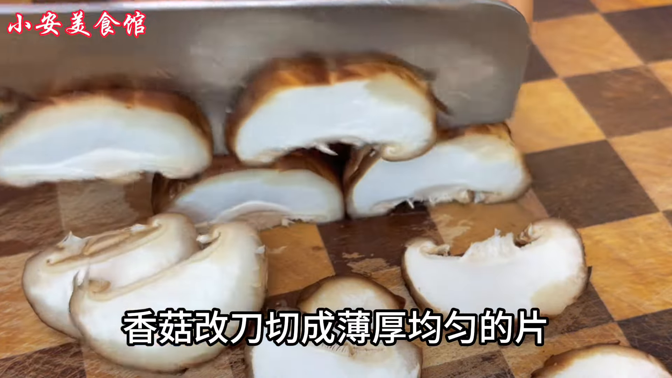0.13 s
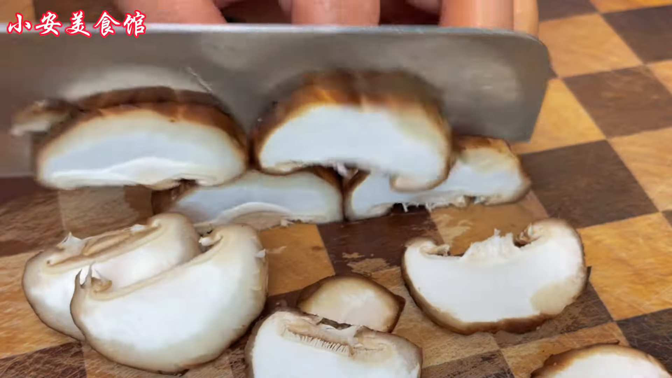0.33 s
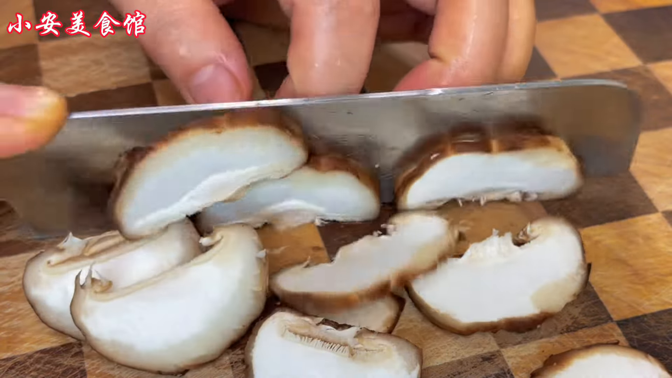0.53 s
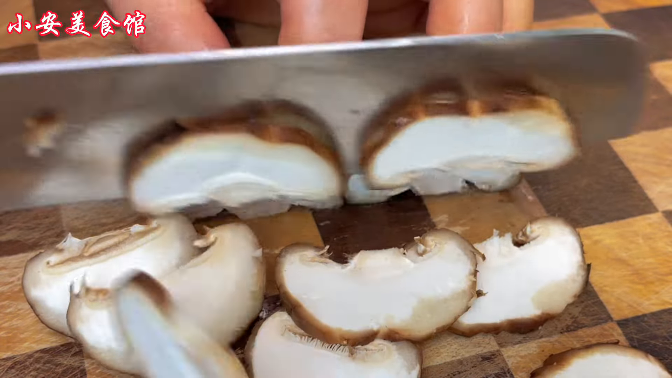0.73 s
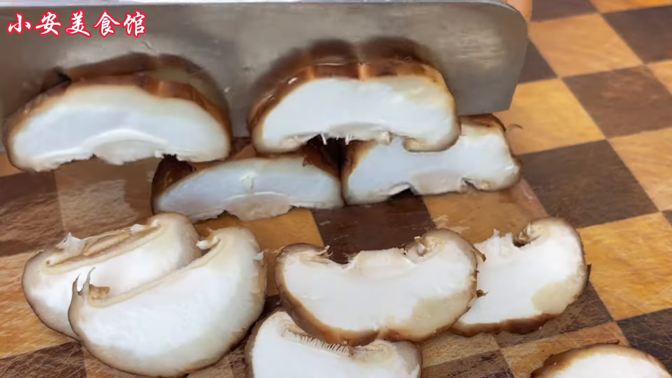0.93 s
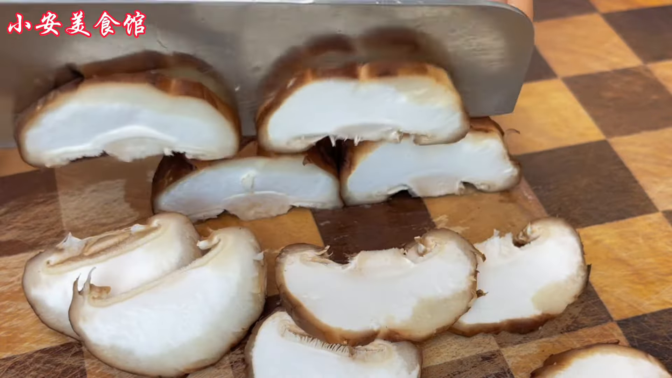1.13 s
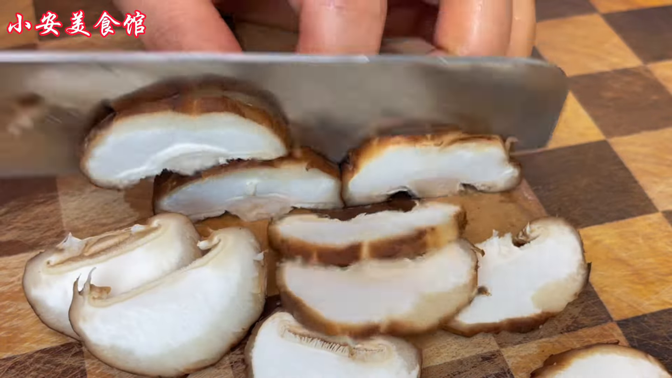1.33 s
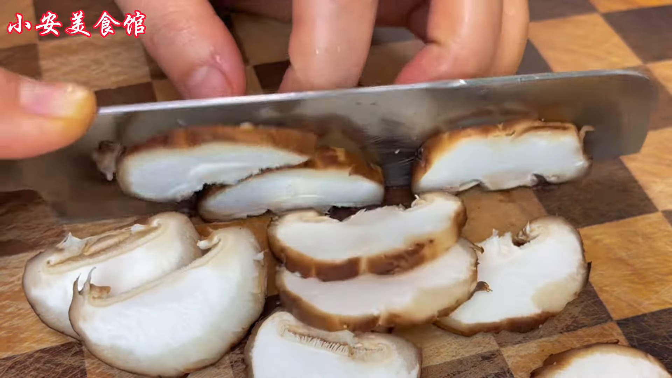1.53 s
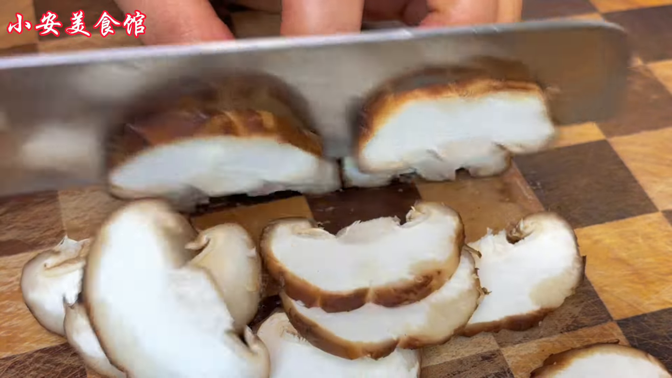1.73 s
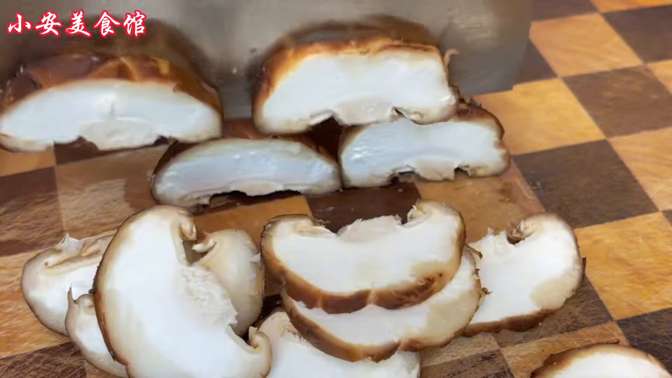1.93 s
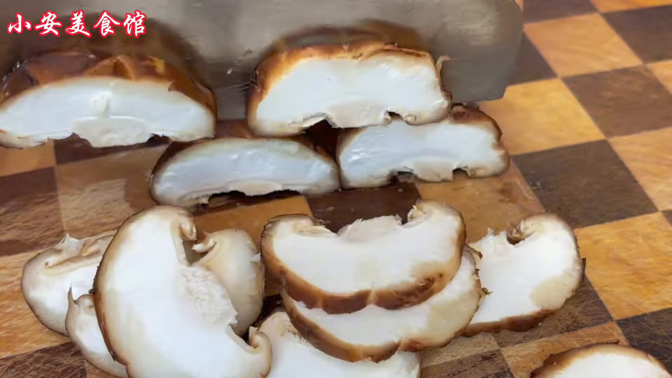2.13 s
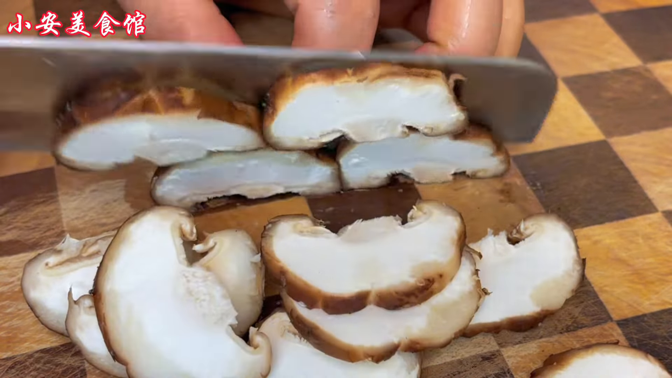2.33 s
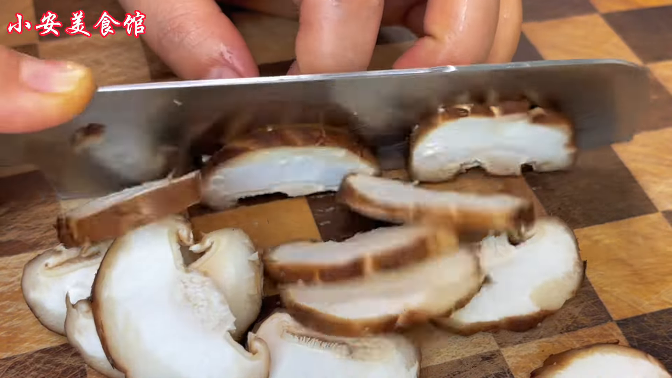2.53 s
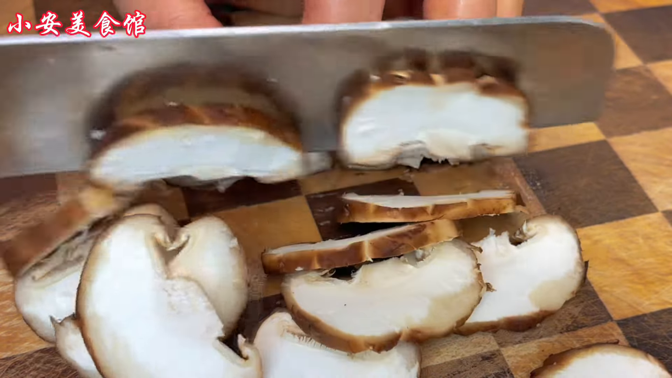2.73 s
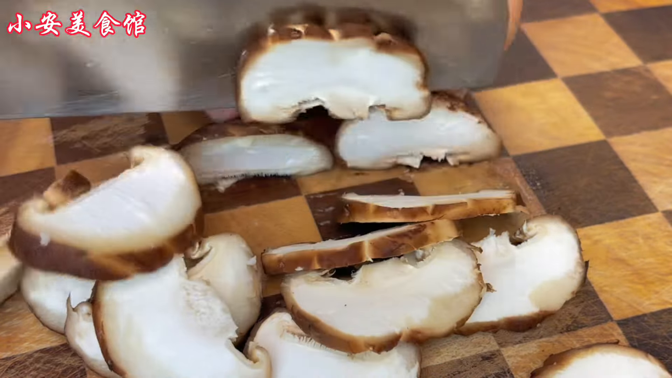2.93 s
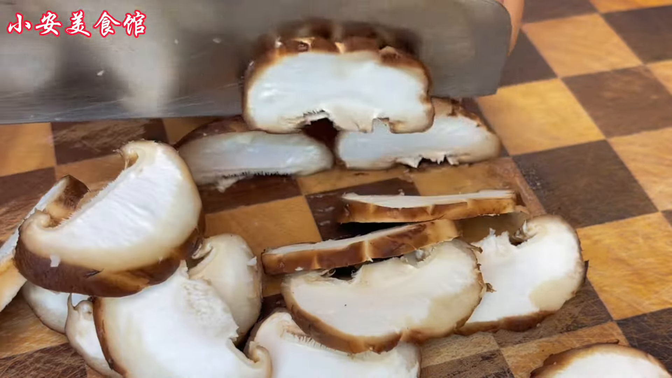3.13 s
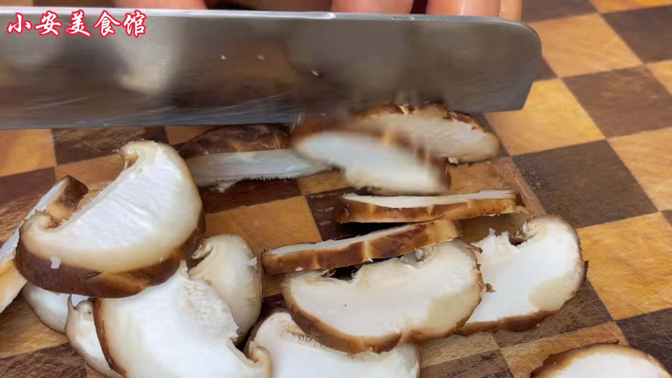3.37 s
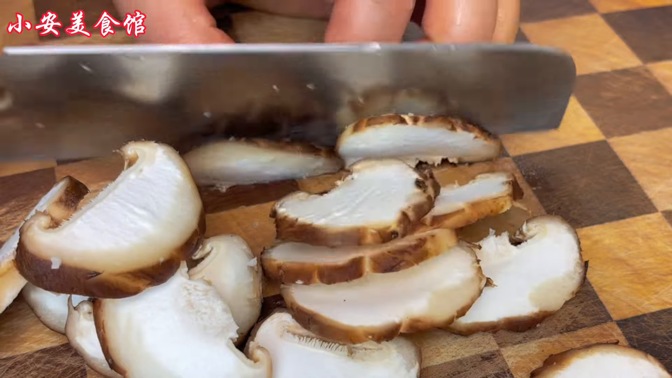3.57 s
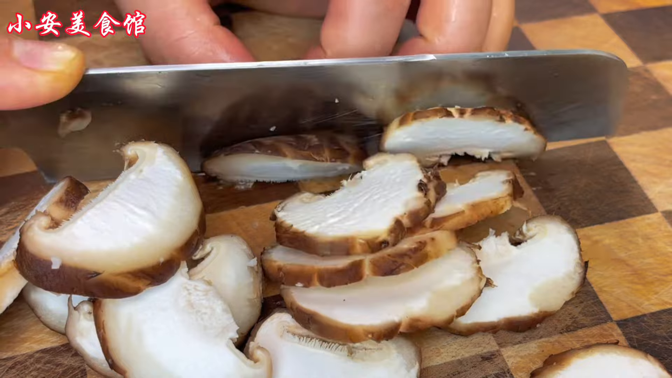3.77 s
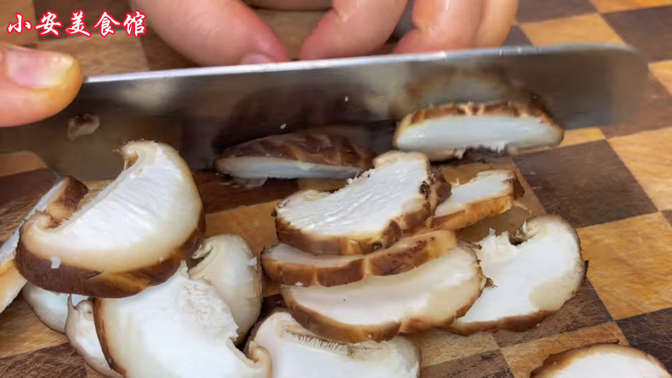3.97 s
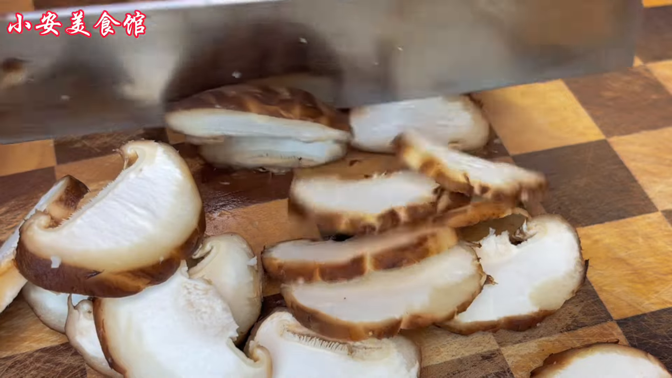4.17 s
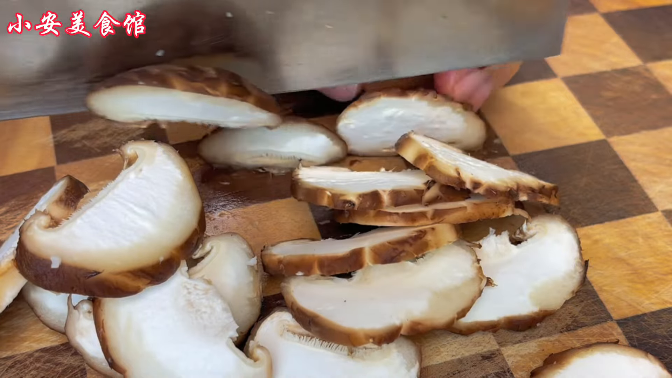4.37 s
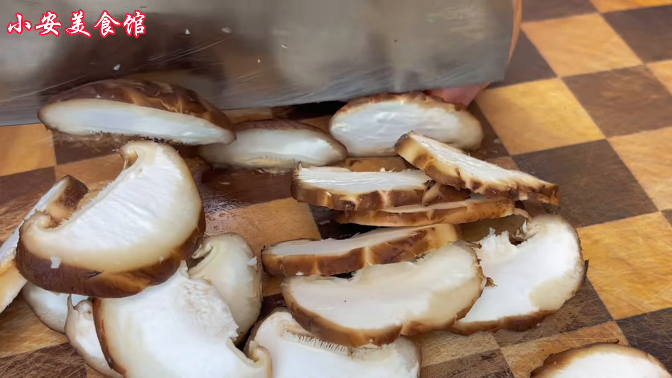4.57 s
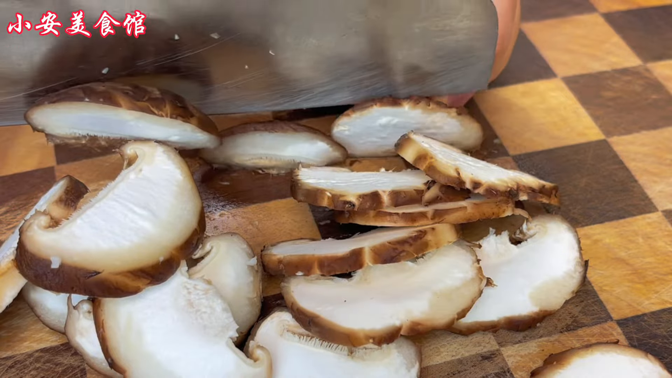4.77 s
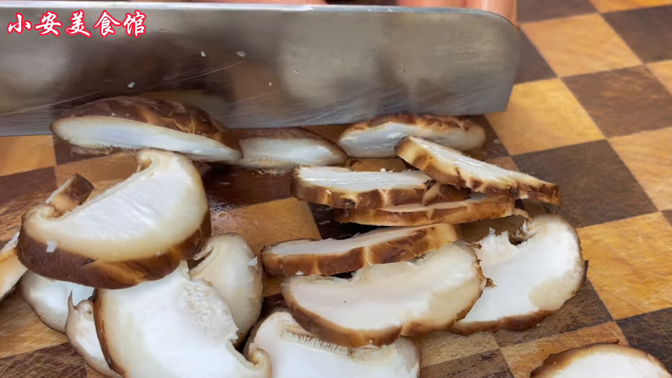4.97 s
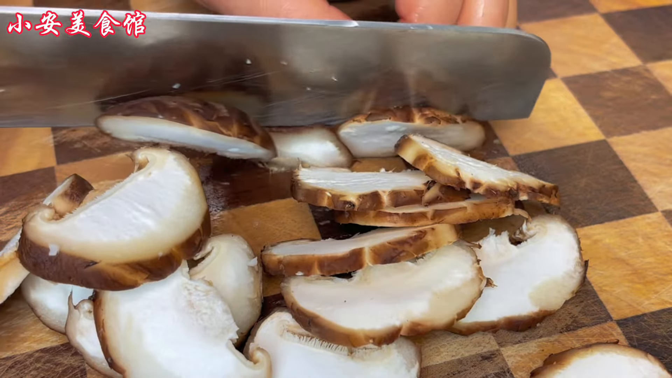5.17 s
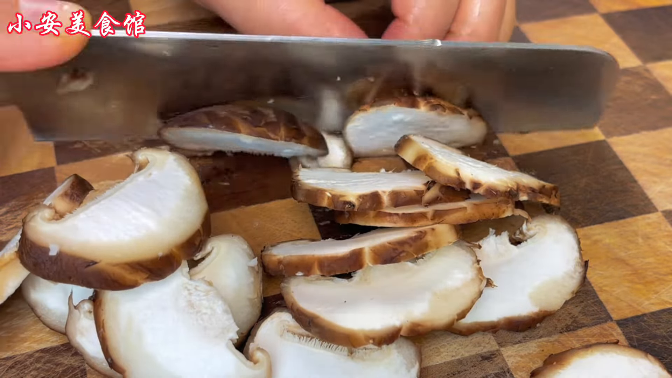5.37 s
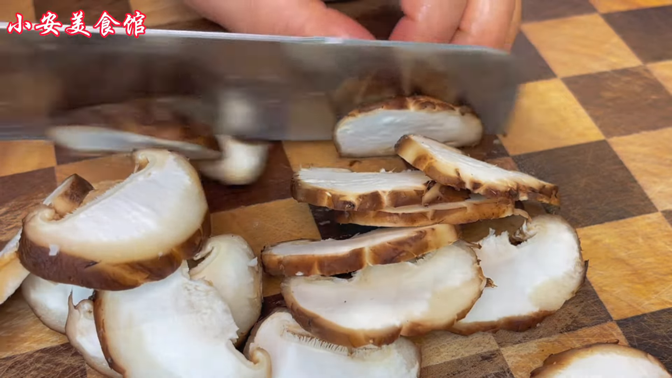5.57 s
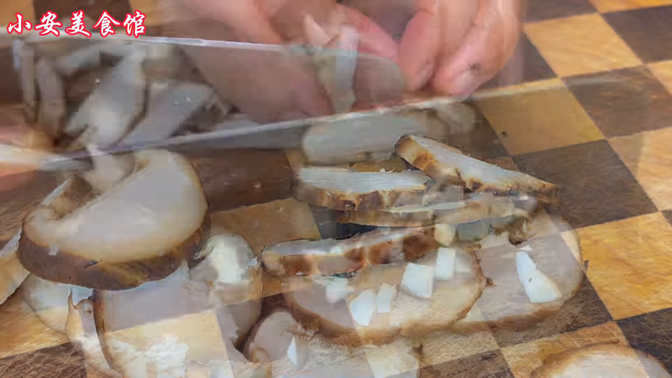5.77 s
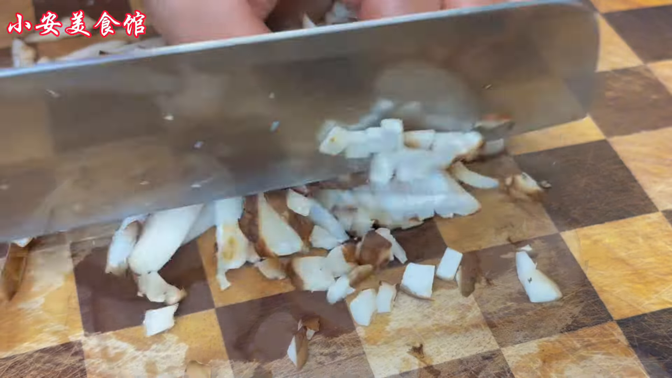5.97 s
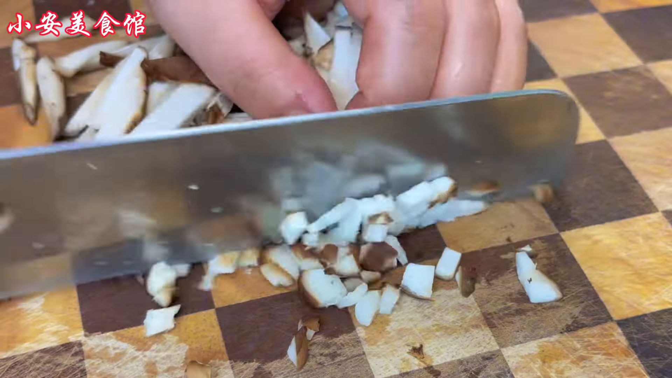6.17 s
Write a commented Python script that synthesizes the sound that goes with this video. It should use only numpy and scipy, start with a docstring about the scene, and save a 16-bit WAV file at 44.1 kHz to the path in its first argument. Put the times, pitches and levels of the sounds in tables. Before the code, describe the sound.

A dying scrape and small taps open a close kitchen scene with low fan hum. A cleaver then presses through mushrooms about once a second, each stroke a hiss, moist crunch and short squeak before a solid woody knock. Slices flop and brush between strokes, the counter shudders deeply, and after a longer pause the last three knocks come closer together. Close stereo microphone, little room echo.

```python
"""A wide cleaver slices mushrooms on a thick wooden board in a home kitchen.
Fan hum and room noise run throughout; at first a scrape dies away among squeaks and taps.
Seven strokes follow: filtered noise hisses and crunches, wet flesh squeaks in gliding narrow bands,
then the edge knocks the board modes and the counter shudders at its lowest mode.
Between them slices drop and brush, and the steel ticks and sings in its own modes."""
import sys
import numpy as np
from scipy import signal
from scipy.fft import rfft, irfft, next_fast_len
from scipy.io import wavfile

SR = 44100
rng = np.random.default_rng(int(sys.argv[2]) if len(sys.argv) > 2 else 0)


def log_audio(samples):
    """Write samples as a 16-bit WAV file to the path given in sys.argv[1]."""
    # one column per channel
    frames = np.atleast_2d(samples).T
    # limit to full scale, then quantise
    limited = np.clip(frames, -1, 1)
    pcm = np.round(limited * 32767).astype(np.int16)
    wavfile.write(sys.argv[1], SR, pcm)


N = 273420
TIME_S = np.arange(N) / SR

# edge meets wood, heel first: blow_s, thud_db, thud_hz, ring_db, hardness_db_per_octave (about 500 Hz),
# damping (factor on mode t60), touch_db, touch_lead_s, crack_db, rattle_db, thud_rise_s, thud_t60_s
KNOCKS = [(0.4757, 5.5, 646, -11, 9, 0.78, -18, .006, -19, -22.5, 0.0017, 0.021),
          (1.4334, 1, 642, -6.5, 8.5, 0.81, -12, .0085, -11, -15.5, 0.0031, 0.021),
          (2.4263, 2.5, 591, -4.5, 0, 0.71, -15, .009, -2.5, -19.5, 0.0014, 0.018),
          (3.639, -4.5, 473, -11, 10.5, 0.8, -11, .0075, -9, -18, 0.0023, 0.029),
          (5.347, 6, 480, -11.5, -13, 1.2, -28, .0075, -28, -23, 0.00098, 0.023),
          (5.6233, 5, 486, -15.5, -18, 0.89, -17.5, .008, -20, -31, 0.0013, 0.019),
          (6.161, 5.5, 480, -1.5, -6, 0.45, -22, .008, -28, -18.5, 0.0012, 0.02)]
# background levels: start_s, room_db, hiss_db, rustle_db, board_murmur_db
ROOM = [(0, -39, -68, -60, -71), (.21, -43, -81, -64, -57), (.7, -43.5, -66, -61, -47),
        (1.2, -36.5, -76, -73, -48), (1.7, -41, -77, -72, -51), (2.2, -40.5, -82, -60, -51),
        (2.8, -39.5, -83, -77, -50.5), (3.2, -42, -83, -67, -50), (3.85, -43, -83, -57.5, -44),
        (4.2, -44, -80, -64.5, -52.5), (4.6, -40, -67, -66, -61), (4.9, -46, -76, -61, -67),
        (5.44, -51.5, -62, -59, -46.5), (5.7, -31, -46, -51, -34.5), (6.2, -36, -72, -59, -58)]


def amp(db):
    """dB to gain."""
    return 10 ** (np.asarray(db) / 20)


def rms_one(x):
    """Scales to rms 1."""
    return x / np.sqrt(np.mean(x ** 2) + 1e-20)


def in_time(rows):
    """Interpolates each column over time, one value a sample."""
    start_s, *columns = np.transpose(rows)
    return [np.interp(TIME_S, start_s, column) for column in columns]


def at_hz(points, hz):
    """Reads a spectrum on a log frequency axis."""
    point_hz, value = np.transpose(points)
    return np.interp(np.log(hz), np.log(point_hz), value)


def drift(rate_hz):
    """Slow random curve of rms 1: noise through two poles at rate_hz, every 40 samples."""
    r = np.exp(-80 * np.pi * rate_hz / SR)
    slow = signal.lfilter([1], [1, -2 * r, r * r], rng.standard_normal(N // 40 + 2002))[2000:]
    return np.interp(np.arange(N) / 40, np.arange(len(slow)), rms_one(slow))


def ring(force, hz, t60_s):
    """Two-pole resonator: a unit click starts a decaying sine of height 1."""
    r, w = amp(-60 / (t60_s * SR)), 2 * np.pi * hz / SR
    return signal.lfilter([0, np.sin(w)], [1, -2 * r * np.cos(w), r * r], force + 1e-18)


def resonance(noise, hz, width_hz):
    """Noise through one resonance of the given bandwidth, rms 1."""
    return rms_one(ring(noise, hz, np.log(1000) / (np.pi * width_hz)))


def swell(force, hz, t60_s):
    """Lasting contact: a mode swells over a cycle or two before it decays."""
    rise_s = 1.66 / hz
    return ring(ring(force, hz, rise_s), hz, t60_s) * 2 * np.log(1000) / (rise_s * SR)


def clicks(seconds, sizes):
    """A train of one-sample clicks."""
    out = np.zeros(N)
    at = np.clip(np.round(np.asarray(seconds) * SR).astype(int), 0, N - 1)
    np.add.at(out, at, sizes)
    return out


def arch(start_s, length_s):
    """Envelope that swells and fades."""
    return np.sqrt(np.abs(np.sin(np.pi * np.clip((TIME_S - start_s) / length_s, 0, 1))))


def contour(seconds, levels_db, quiet_db=-80):
    """Gain that rises out of quiet through the given levels and falls back."""
    return amp(np.interp(TIME_S, seconds, [quiet_db, *levels_db, quiet_db]))


def bandpass(x, low_hz, high_hz):
    """Butterworth bandpass."""
    return signal.sosfilt(signal.butter(2, [low_hz, high_hz], "band", fs=SR, output="sos"), x)


def contact_noise(low_hz):
    """Bright noise of a hard contact."""
    return bandpass(rng.standard_normal(N), low_hz, 12000)


def coloured(spectrum, patchy_db, rate_hz, grain_db, grain_samples):
    """Gritty stereo noise in third-octave bands, each flickering on its own; rms 1."""
    # stereo image: band_hz, left_right_likeness (1 = same)
    likeness = [(60, 1), (250, 0.7), (700, 0.07), (1400, 0.13), (2200, 1), (7000, 1), (8500, 1),
                (10000, 0.89)]
    low_end, high_end = np.array(spectrum)[[0, -1], 0]
    edges = low_end * 2 ** np.arange(0, np.log2(high_end / low_end) + 1 / 3, 1 / 3)
    edges = edges[edges < .42 * SR]
    grains = np.minimum(rng.exponential(1, N // grain_samples + 1), 3.5)
    grit = amp(grain_db * np.repeat(grains, grain_samples)[:N])
    white, out = rng.standard_normal((2, 2, N)) * grit, 0
    for k, (low, high) in enumerate(zip(edges, edges[1:])):
        mid, side = bandpass(white[k % 2], low, high)
        hz = np.sqrt(low * high)
        alike = np.clip(at_hz(likeness, hz), -1, 1)
        gain = amp(at_hz(spectrum, hz) + patchy_db * drift(rate_hz))
        out = out + gain * (np.sqrt(1 + alike) * mid + np.sqrt(1 - alike) * side * [[1], [-1]])
    return rms_one(out)


def room_tone(shake):
    """Broad room noise, louder with each shudder, and fan noise in narrow resonances."""
    # noise shape: band_hz, level_db_per_hz (relative)
    tone_spectrum = [(38, -12), (65, 3), (110, 8), (153, 2), (242, 3), (408, -10.5), (453, -10), (571, -5),
                     (718, -13), (1020, -11.5), (1490, -21), (2510, -57), (3820, -88), (6170, -35.5),
                     (9570, -56), (12400, -12), (21100, -120)]
    # fan resonances: pitch_hz, width_hz, level_db (before fan_db)
    hum_modes = [(99.5, 7.3, -65.5), (123, 21, -61.5), (246.8, 5.8, -51.5), (1014, 105, -52.5),
                 (1450, 300, -65.5), (1850, 69, -63), (2300, 330, -72)]
    # fan over time: start_s, fan_db, drone_db
    fan_levels = [(0, 2.5, -58), (.9, 2.5, -53), (1.6, 5.5, -47), (2.2, 4.5, -49), (3.0, 5, -48.5),
                  (3.4, 1, -67), (4.0, 5, -47), (4.4, 4, -44), (4.62, 5, -45.5), (4.82, -1.5, -59.5),
                  (6.2, 3, -47)]
    drone_hz, drone_width_hz, hum_waver_db, rumble_db = 560, 87, 1.5, -27
    hum = 0
    for hz, width_hz, level_db in hum_modes:
        gain = amp(level_db + hum_waver_db * drift(2))
        hum = hum + gain * resonance(rng.standard_normal(N), hz, width_hz)
    fan_db, drone_db = in_time(fan_levels)
    drone = amp(drone_db) * resonance(rng.standard_normal(N), drone_hz, drone_width_hz)
    room_gain = np.hypot(amp(in_time(ROOM)[0]), amp(rumble_db) * shake)
    noise = coloured(tone_spectrum, patchy_db=3.0, rate_hz=28, grain_db=-1.8, grain_samples=16)
    return room_gain * noise + amp(fan_db) * hum + drone


def earlier_scrape():
    """The tail of a scrape: noise in a few broad resonances, fading from the start."""
    # resonances: pitch_hz, width_hz, level_db_per_hz (relative)
    scrape_modes = [(185, 50, 6.5), (450, 480, -15.5), (900, 300, -10), (2340, 190, -10.5),
                    (2730, 280, -14), (4360, 2700, -31.5), (7100, 250, -18), (7480, 160, -17),
                    (9600, 250, -18)]
    start_db, t60_s = -19.5, 0.4
    noise = rng.standard_normal(SR)
    sound = sum(amp(db) * np.sqrt(width_hz) * resonance(noise, hz, width_hz)
                for hz, width_hz, db in scrape_modes)
    fade = amp(start_db - 60 * np.arange(SR) / SR / t60_s)
    return np.pad(rms_one(sound) * fade, (0, N - SR))


def squeaks():
    """Wet flesh squeaks and groans on steel and wood: narrow gliding noise, gritty as it catches."""
    # start_s, length_s, start_hz, end_hz, width_hz, level_db
    squeak_rows = [(0, 0.053, 894, 800, 150, -35), (0.031, 0.11, 2350, 2300, 350, -40),
                   (.05, 0.066, 7500, 8000, 400, -44), (.37, 0.032, 1005, 1800, 150, -47),
                   (0.396, 0.051, 2200, 2600, 1200, -36), (0.416, 0.032, 1286, 1500, 100, -36),
                   (0.441, 0.019, 1410, 2500, 400, -30.5), (0.455, 0.017, 2300, 1700, 500, -29),
                   (0.48, .03, 810, 440, 200, -27), (.49, .08, 2870, 3100, 200, -47),
                   (1.339, 0.11, 2300, 2400, 895, -33.5), (1.36, .07, 1110, 1400, 300, -36),
                   (1.415, 0.027, 2800, 2600, 600, -28.5), (1.44, .025, 604, 390, 150, -23.5),
                   (2.351, 0.061, 2500, 2700, 900, -32.5), (2.355, 0.06, 1513, 1550, 500, -37),
                   (2.462, 0.086, 2690, 2460, 600, -34), (3.404, 0.29, 2800, 2600, 600, -51.5),
                   (3.643, 0.16, 1885, 1770, 200, -41), (3.648, 0.12, 1023, 980, 100, -37),
                   (3.648, 0.031, 402, 360, 60, -29), (3.684, 0.095, 578.5, 540, 60, -30.5),
                   (3.703, 0.073, 450, 410, 60, -30), (3.653, .13, 1450, 1400, 500, -43),
                   (3.648, 0.16, 2780, 2600, 200, -52), (4.466, 0.073, 2460, 2400, 25, -57),
                   (5.157, 0.19, 2500, 3000, 500, -48), (5.295, .055, 2950, 2400, 400, -44),
                   (5.355, 0.065, 2150, 1950, 400, -43.5), (5.494, 0.16, 1896, 2000, 90, -38.5),
                   (5.654, 0.078, 2500, 2700, 900, -33.5), (5.722, .045, 1609, 1300, 499.6, -35.5),
                   (5.745, 0.016, 2800, 3000, 800, -35)]
    grit_db = 2
    out = np.zeros(N)
    for start_s, length_s, start_hz, end_hz, width_hz, level_db in squeak_rows:
        at, n = round(start_s * SR), round(length_s * SR)
        r = np.exp(-np.pi * width_hz / SR)
        real, imag = rng.standard_normal((2, SR // 2))[:, :n + 2000]
        band = signal.lfilter([np.sqrt(1 - r * r)], [1, -r], real + 1j * imag)[2000:]
        phase = 2 * np.pi * np.cumsum(np.geomspace(start_hz, end_hz, n)) / SR
        envelope = amp(level_db) * np.sqrt(np.sin(np.pi * np.arange(n) / n))
        out[at:at + n] += envelope * (band * np.exp(1j * phase)).real   # shifts the band to its pitch
    return out * rms_one(amp(grit_db * drift(150)))


def taps():
    """Slices drop and the blade taps wood: a noise puff through a broad resonance."""
    # start_s, peak_db, pitch_hz, t60_s (floored at 3 ms)
    tap_rows = [(.002, -15.5, 865, 0.054), (0.023, -12.5, 2440, 0.0027), (0.0243, -11, 2270, 0.017),
                (0.0218, -26, 1450, 0.0052), (.024, -16, 3220, 0.004), (.023, -12, 912, 0.035),
                (0.182, -30, 1650, 0.009), (0.199, -31, 1310, 0.005), (0.46, -12.5, 2020, 0.022),
                (.461, -15.5, 2800, 0.021), (.469, -17, 1900, .008), (.473, -5.5, 623, 0.05),
                (.479, -16, 2000, .01), (.477, -5, 1080, 0.025), (0.556, -21, 160, 0.046),
                (0.645, -19, 156, 0.058), (.833, -24, 1400, .006), (.858, -32, 1900, .008),
                (0.987, -33, 1090, 0.012), (1.035, -20, 370, .06), (1.035, -25, 1080, 0.0054),
                (1.291, -22, 1060, 0.0069), (1.293, -25.5, 2010, 0.0095), (1.292, -25.5, 250, 0.052),
                (1.416, -18, 1310, 0.018), (1.421, -11, 1240, 0.03), (1.431, -9, 590, 0.033),
                (1.459, -24, 500, 0.014), (1.478, -21, 900, 0.011), (1.583, -28.5, 2800, 0.0024),
                (1.620, -30.5, 1980, 0.0041), (1.977, -24, 1300, 0.016), (2.294, -26, 2010, .006),
                (2.305, -28, 1310, 0.0089), (2.417, -8.5, 2800, 0.0023), (2.709, -29, 1440, 0.004),
                (2.709, -32, 2490, .003), (2.958, -24, 12500, 0.0097), (3.607, -23, 2300, 0.008),
                (3.632, -3, 490, .05), (3.643, -2, 462, 0.027), (3.641, -7, 1750, 0.012),
                (3.640, -6, 880, 0.012), (3.679, -14, 450, 0.024), (3.696, -22, 560, 0.055),
                (3.712, -23, 465, 0.082), (3.742, -22.5, 547, 0.048), (3.961, -27, 188, 0.11),
                (4.080, -18.5, 1160, 0.011), (4.080, -27, 1980, 0.0034), (5.339, -14, 480, 0.064),
                (5.38, -17.5, 480, 0.1), (5.348, -22, 1600, 0.0068), (5.347, -28, 3200, .004),
                (5.354, -17, 200, 0.028), (5.611, -14.5, 2160, .008), (5.612, -17, 2920, 0.0073),
                (5.612, -10, 990, 0.0079), (5.626, -17, 1610, .008), (5.632, -7.5, 407, 0.063),
                (5.663, -16, 420, 0.1), (5.672, -18, 430, 0.045), (5.67, -25, 1200, .015),
                (5.739, -21, 1070, .015), (5.742, -9.5, 173, 0.04), (5.751, -12, 314, 0.023),
                (5.755, -27, 560, 0.018), (5.765, -32, 1250, .008), (5.801, -30, 2900, 0.0044),
                (5.802, -14.5, 1250, 0.012), (5.803, -14, 360, 0.043), (6.097, -40, 1020, 0.0092),
                (6.14, -7, 855, 0.0026)]
    out, t = np.zeros(N), np.arange(3000) / SR
    noises = rng.standard_normal((len(tap_rows), 3000))
    for (start_s, peak_db, hz, t60_s), noise in zip(tap_rows, noises):
        puff = noise * np.exp(-t / 0.00061)
        sound = ring(ring(puff, hz, max(t60_s, .003)), hz, 0.66 / hz)
        at = round(start_s * SR)
        out[at:at + 3000] += (amp(peak_db) * sound / abs(sound).max())[:N - at]
    return out


def kitchen(x):
    """Room echo: eight feedback delays a side, duller on every round."""
    t60_s, wall_cut_hz = .35, 1200
    size = next_fast_len(N + SR)
    spectrum, w = rfft(x, size), 2 * np.pi * np.arange(size // 2 + 1) / size
    dull = 1 / (1 + 1j * w * SR / (2 * np.pi * wall_cut_hz))
    out = np.zeros((2, size // 2 + 1), complex)
    for k, lag in enumerate(np.round(rng.uniform(0.0088, .03, 16) * SR)):
        loop = amp(-60 * lag / SR / t60_s) * dull * np.exp(-1j * w * lag)
        out[k % 2] += loop / (1 - loop) * (-1) ** (k // 2)
    return irfft(out * spectrum, size)[:, :N]


def cutting():
    """Gains of hiss, crunch and drag: pressure of strokes and brushes over the background rustle."""
    # one a knock: entry_s, full_pressure_s, exit_s, hiss_db at entry, full pressure, after blow,
    # crunch_db at entry, full pressure, blow, after blow, drag_db before blow, after blow
    strokes = [(0.281, 0.418, 0.55, -55.5, -32, -42.5, -64, -38.5, -23.5, -38.5, -75, -31),
               (1.289, 1.365, 1.52, -44, -31, -40, -53, -35, -16.5, -38, -36.5, -29.5),
               (2.292, 2.397, 2.525, -37, -33, -35.5, -47.5, -40, -25.5, -38.5, -42, -36.5),
               (3.217, 3.546, 3.7, -56, -40.5, -61, -60, -48.5, -15, -40, -65, -33),
               (5.147, 5.307, 5.405, -61, -41.5, -43, -67, -52.5, -35, -47, -77, -51),
               (5.486, 5.565, 5.71, -51.5, -33, -33, -58, -43.5, -30.5, -42, -42, -29),
               (6.136, 6.128, 6.32, -30, -35, -30.5, -42, -28, -59, -37, -21, -26)]
    # slices and fingers brush steel and wood: start_s, length_s, hiss_db, crunch_db, drag_db
    brushes = [(.004, 0.11, -35, -45, -34), (0.112, 0.12, -59, -46, -67), (0.563, 0.11, -74, -51, -27.5),
               (0.644, 0.033, -42.5, -46, -34), (0.83, 0.33, -75, -51.5, -62),
               (1.037, 0.047, -47, -46.5, -38), (1.147, 0.051, -43, -71, -53),
               (1.525, 0.12, -50, -50, -29.5), (1.605, 0.078, -45.5, -48, -37),
               (1.873, 0.063, -62, -53, -47), (1.988, 0.061, -40, -46, -40),
               (2.101, 0.047, -45.5, -49.5, -55), (2.533, 0.19, -46, -48.5, -41),
               (2.702, 0.048, -52, -51, -60), (2.961, 0.056, -43, -50, -50), (3.619, 0.026, -26, -35, -31),
               (3.77, 0.12, -81, -62, -28), (3.963, 0.14, -44.5, -43, -44), (5.02, 0.32, -48.5, -52.5, -63),
               (5.731, 0.049, -31, -33.5, -45), (5.782, 0.3, -62, -47.5, -56),
               (6.089, 0.052, -47, -56, -44)]
    entry_rise_s, exit_fall_s, blow_lag_s = 0.011, .04, .004
    burst_rise_s, burst_fall_s, hiss_burst_db = 0.026, 0.00097, 6
    brush_rise_s, brush_fade_db, brush_fall_s = 0.025, -17.5, 0.033
    hiss, crunch, drag = amp(in_time(ROOM)[1:])
    for knock, stroke in zip(KNOCKS, strokes):
        entry, full, leave, hiss_in, hiss_push, hiss_out = stroke[:6]
        crunch_in, crunch_push, crunch_blow, crunch_out, drag_in, drag_out = stroke[6:]
        blow = knock[0] + blow_lag_s
        s = np.maximum.accumulate([entry - entry_rise_s, entry, full, blow - burst_rise_s, blow,
                                   blow + burst_fall_s, leave, leave + exit_fall_s])
        hiss_db = [hiss_in, hiss_push, hiss_push, hiss_push + hiss_burst_db, hiss_out, hiss_out]
        crunch_db = [crunch_in, crunch_push, crunch_push, crunch_blow, crunch_out, crunch_out]
        drag_db = [drag_in, drag_in, drag_in, drag_in, drag_out, drag_out]
        hiss = np.hypot(hiss, contour(s, hiss_db))
        crunch = np.hypot(crunch, contour(s, crunch_db))
        drag = np.hypot(drag, contour(s, drag_db))
    for start, length, hiss_db, crunch_db, drag_db in brushes:
        end = start + length
        s = [start - brush_rise_s, start, end, end + brush_fall_s]
        shape = contour(s, [0, brush_fade_db], quiet_db=-40)
        hiss = np.hypot(hiss, amp(hiss_db) * shape)
        crunch = np.hypot(crunch, amp(crunch_db) * shape)
        drag = np.hypot(drag, amp(drag_db) * shape)
    return hiss, crunch, drag


def tearing():
    """Fibres tear in grains: random snaps of uneven size, each ringing a few cycles at one of 12 pitches."""
    tears_per_s, ring_cycles = 800, 14
    torn = rng.random(N) < tears_per_s / SR
    sizes = amp(4 * np.minimum(rng.exponential(1, N), 3)) * torn
    pitches_hz, dealt = np.geomspace(900, 3000, 12), rng.integers(0, 12, N)
    return rms_one(sum(ring(sizes * (dealt == k), hz, ring_cycles / hz)
                       for k, hz in enumerate(pitches_hz)))


def shaking():
    """Gain of the counter's motion: a Gaussian swell after blows and when the arm shifts."""
    # peak_s, level_db, length_s (four standard deviations)
    shudders = [(.01, -48, 0.079), (0.54, -22, 0.068), (0.618, -17, 0.1), (0.713, -32, 0.085),
                (.86, -51, .1), (1.25, -33.5, 0.09), (1.396, -28, 0.075), (1.562, -22, .14),
                (1.684, -32, 0.049), (2.194, -41, 0.09), (2.382, -31.5, 0.13), (2.558, -18, 0.13),
                (2.665, -34.5, 0.11), (3.043, -41.5, 0.13), (3.502, -44, 0.12), (3.627, -31, 0.05),
                (3.7, -40, 0.072), (3.83, -26.5, 0.13), (4.014, -45, 0.16), (4.707, -48, 0.12),
                (5.426, -40, 0.17), (5.607, -32.5, 0.18), (5.684, -26, 0.045), (5.725, -23, 0.022),
                (5.798, -12, 0.13), (6.204, -17, 0.12)]
    return sum(amp(db) * np.exp(-.5 * ((TIME_S - peak_s) / (length_s / 4)) ** 2)
               for peak_s, db, length_s in shudders)


def shudder(shake):
    """Lowest counter mode, pitch wavering, weak overtone; things on the counter rattle along."""
    mode_hz, rattle_hz, rattle_db, tremor_db = 46.5, 160, -12.5, -60
    phase = 2 * np.pi * np.cumsum(mode_hz * (1 + 0.034 * drift(28))) / SR
    tone = np.sqrt(2) * (np.sin(phase) + 0.13 * np.sin(2 * phase))
    rattle = amp(rattle_db) * rms_one(ring(rng.standard_normal(N), rattle_hz, 0.13))
    return (shake + amp(tremor_db)) * (tone + rattle)   # a faint tremor never stops


def blade(hiss):
    """Steel modes: flicked by snapping fibres, rubbed by sliding slices, sung softly along the hiss."""
    # fibres snap: start_s, peak_db, t60_s (floored at 2 ms), ring_db (re peak)
    ticks = [(0.182, -36.5, 0.011, -27), (0.647, -30.5, 0.02, -27), (0.833, -38, 0.005, -33),
             (0.858, -48, .006, -15), (0.931, -44, 0.0067, -13), (0.986, -34, 0.0088, -32),
             (1.037, -32, 0.0068, -19), (1.291, -24, 0.013, -21), (1.987, -22.5, 0.022, -14),
             (2.419, -16, 0.011, -35), (2.627, -32, .008, -32), (2.699, -39, 0.0053, -33),
             (2.72, -31.5, 0.0054, -31), (2.956, -21, 0.039, -11), (3.402, -33, .008, -12),
             (3.634, -8.5, 0.016, -52), (5.099, -34, 0.011, -15), (5.613, -11, 0.0087, -42),
             (5.8, -26.5, 0.024, -16), (6.14, -9.5, 0.0083, -22)]
    # slices slide: start_s, length_s, level_db
    rubs = [(1.044, 0.049, -54.5), (1.147, 0.038, -59), (2.002, 0.038, -56), (2.118, 0.024, -60),
            (2.946, 0.068, -78), (3.223, 0.047, -70), (6.06, 0.1, -56), (5.84, 0.079, -62)]
    # free modes: pitch_hz, level_db (halved in the song), t60_s (undamped)
    blade_modes = [(2126, -16, .1), (2885, -6, .07), (3450, -7, .09), (3660, -10, .08), (4745, -5, .08),
                   (5220, -14, .06), (5900, -3, .09), (6620, -11, .06), (7063, -10, .05), (7440, -11, .06),
                   (7830, -9, .05), (8430, -13, .05), (8745, -4, .11), (9190, -13, .05)]
    sing_db, sing_damping = -9, .3   # re hiss; flesh shortens t60 by this factor
    snaps, rub = np.zeros(N), np.zeros(N)
    for start_s, peak_db, t60_s, _ in ticks:
        decay = amp(peak_db - 60 * np.abs(TIME_S - start_s) / max(t60_s, .002))
        snaps += decay * (TIME_S >= start_s)
    for start_s, length_s, level_db in rubs:
        rub += amp(level_db) * arch(start_s, length_s)
    tick_s, peak_db, _, ring_db = np.transpose(ticks)
    scatter_db = rng.normal(0, 2.5, (len(ticks), len(blade_modes)))
    noise = rng.standard_normal(N)
    song = rms_one(sum(amp(db / 2) * rms_one(ring(noise, hz, sing_damping * t60_s))
                       for hz, db, t60_s in blade_modes))
    out = snaps * contact_noise(5300) + amp(sing_db) * hiss * song
    for k, (hz, level_db, t60_s) in enumerate(blade_modes):
        flick = clicks(tick_s, amp(peak_db + ring_db + scatter_db[:, k]))
        rubbing = rub * noise / np.sqrt(t60_s * SR / 25)   # evens out long and short modes
        out += amp(level_db) * ring(flick + rubbing, hz, t60_s)
    return out


def knocks(drag):
    """Blows: heel touch, broad thud, board modes, crack; drag and rattle scrape the same modes."""
    # board modes: pitch_hz, level_db, t60_s (before damping)
    board_modes = [(250, -22.5, 0.028), (335.5, -12.5, 0.17), (396, 2, 0.072), (432, -2, 0.062),
                   (480, 0.5, 0.069), (565, 3.5, 0.026), (603, -4.5, 0.033), (708, -2.5, 0.05),
                   (771, -7, 0.05), (1080, -8, 0.033), (1240, -17.5, 0.054), (1750, -25, 0.004),
                   (2180, -49, 0.11), (2800, -60, 0.024)]
    rattle_t60_s, crack_t60_s, scrape_damping = 0.12, 0.0084, 0.82
    thud_sag, thud_sag_s = .45, 0.0032   # thud starts high by this share, sags to its pitch
    out, pressure, t = np.zeros(N), drag.copy(), np.arange(SR // 2) / SR
    scatter_db = rng.normal(0, 1.5, (len(KNOCKS), len(board_modes)))
    noise = contact_noise(1500)
    for row, chance_db in zip(KNOCKS, scatter_db):
        blow_s, thud_db, thud_hz, ring_db, hard_db, damping = row[:6]
        touch_db, lead_s, crack_db, rattle_db, rise_s, thud_t60_s = row[6:]
        lead = round(lead_s * SR)
        at = round(blow_s * SR) - lead
        touch, blow = (t == 0) * amp(touch_db), (t == t[lead])
        since = np.maximum(t - t[lead], 0)
        cycles = thud_hz * (since + thud_sag * thud_sag_s * (1 - np.exp(-since / thud_sag_s)))
        envelope = amp(thud_db - 60 * since / thud_t60_s) * (1 - np.exp(-since / rise_s))
        sound = envelope * np.sin(2 * np.pi * cycles)
        for k, (hz, level_db, t60_s) in enumerate(board_modes):
            blow_gain = amp(ring_db + hard_db * np.log2(hz / 500) + chance_db[k])
            force = blow * blow_gain + touch * (hz < 900)   # the touch is too soft for high modes
            sound += (-1) ** k * amp(level_db) * swell(force, hz, t60_s * damping)
        after = t - t[lead] - .001   # crack and rattle come 1 ms after the blow
        sound += (after >= 0) * amp(crack_db - 60 * after / crack_t60_s) * noise[:len(t)]
        noise = np.roll(noise, len(t))
        out[at:at + len(t)] += sound[:N - at]
        rattle = (after >= 0) * amp(rattle_db - 60 * after / rattle_t60_s)
        pressure[at:at + len(t)] += rattle[:N - at]
    scrape = rng.standard_normal(N) * amp(1.5 * drift(50))
    scraped = rms_one(sum(amp(db) * rms_one(ring(scrape, hz, scrape_damping * t60_s))
                          for hz, db, t60_s in board_modes))
    return out + pressure * scraped


def scene():
    """Mixes board with its room echo, steel, flesh, counter and room."""
    # noise shapes: band_hz, level_db_per_hz (relative)
    hiss_spectrum = [(1760, -9.5), (3000, -4.5), (3310, -36.5), (3640, -12), (4010, -24.5), (5290, -0.5),
                     (6150, -2), (6710, -5.5), (7660, -8), (8810, 0.5), (9570, 6.5), (12400, -32.5),
                     (21100, -120)]
    crunch_spectrum = [(410, -28), (700, -4), (1030, 17), (1170, 2), (1480, 11), (2560, 8.5), (3040, 3),
                       (4020, -7), (4200, 10.5), (5460, -29), (9240, -120)]
    kitchen_db, tear_db = -19, 2   # tear_db re crunch noise
    hiss, crunch, drag = cutting()
    steel = blade(hiss)
    hiss = hiss * coloured(hiss_spectrum, patchy_db=3.0, rate_hz=59, grain_db=2.0, grain_samples=24)
    crunch_noise = coloured(crunch_spectrum, patchy_db=3.0, rate_hz=41, grain_db=1.5, grain_samples=64)
    crunch = crunch * (crunch_noise + amp(tear_db) * tearing())
    wood = knocks(drag) + taps() + earlier_scrape()
    # the wood sounds and their echo carry no deep bass
    wood = signal.sosfilt(signal.butter(2, 140, "high", fs=SR, output="sos"), wood)
    board = wood + amp(kitchen_db) * kitchen(wood)
    shake = shaking()
    return board + steel + squeaks() + hiss + crunch + shudder(shake) + room_tone(shake)


def record(dry):
    """Two microphone ports differ in phase and level; treble drops, peaks clip, the top is cut."""
    # band_hz, left_minus_right_db
    port_balance = [(60, 0), (110, -1), (210, -0.5), (390, 1), (740, -2), (1390, -0.5), (2600, -0.5),
                    (4870, 0.0), (9120, 0.0)]
    # band_hz, left_lead_rad
    port_lead = [(40, -1.3), (260, 0.4), (520, 0.1), (780, 0.77), (1030, 0.84), (1640, 0), (3100, 0.1),
                 (7490, 0), (7920, 0.8), (8870, -1), (9300, -1.7), (10000, -3), (11000, 0.5)]
    drop_hz, drop_db, cutoff_hz = 9710, -18.5, 16000
    hz = np.arange(N // 2 + 1) * SR / N + 1e-3
    drop = amp(drop_db / (1 + (drop_hz / hz) ** 40))
    left_right = np.array([[1], [-1]])   # each port takes half the difference
    phase = np.exp(.5j * at_hz(port_lead, hz) * left_right)
    balance = amp(.5 * at_hz(port_balance, hz) * left_right)
    ports = np.clip(irfft(rfft(dry) * drop * phase * balance, N), -1, 1)
    return signal.sosfilt(signal.cheby2(12, 70, cutoff_hz, fs=SR, output="sos"), ports)


dry = scene()
out = record(dry)
log_audio(out)
```